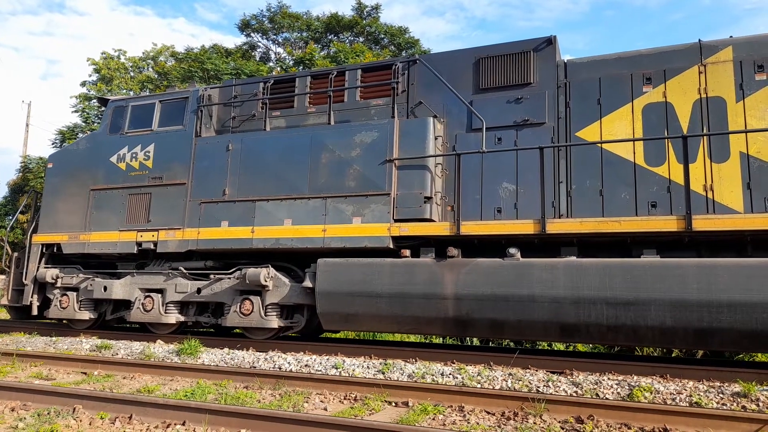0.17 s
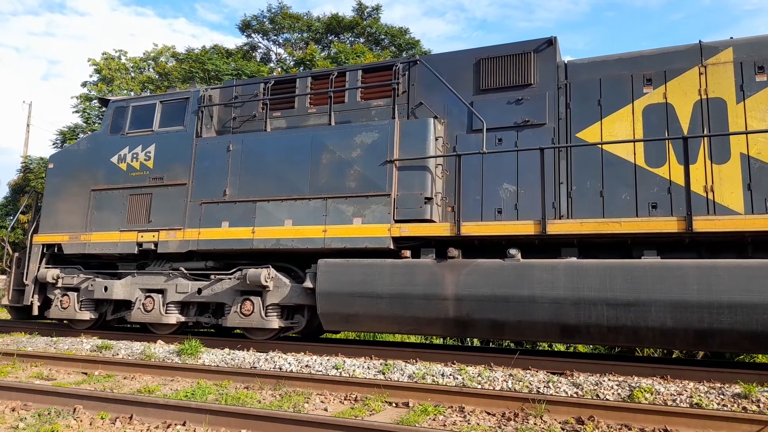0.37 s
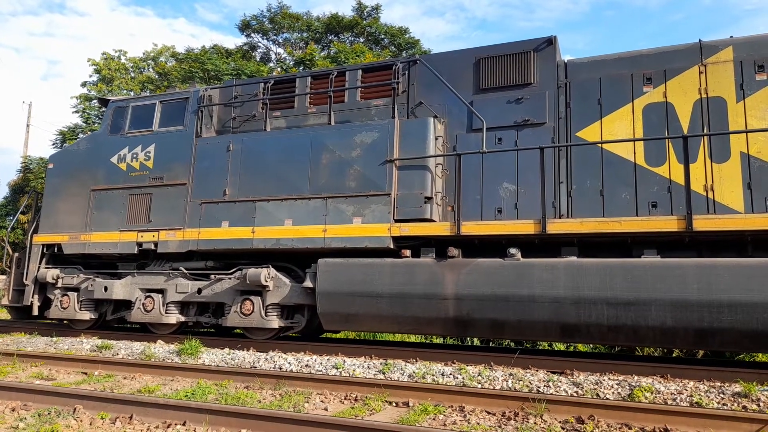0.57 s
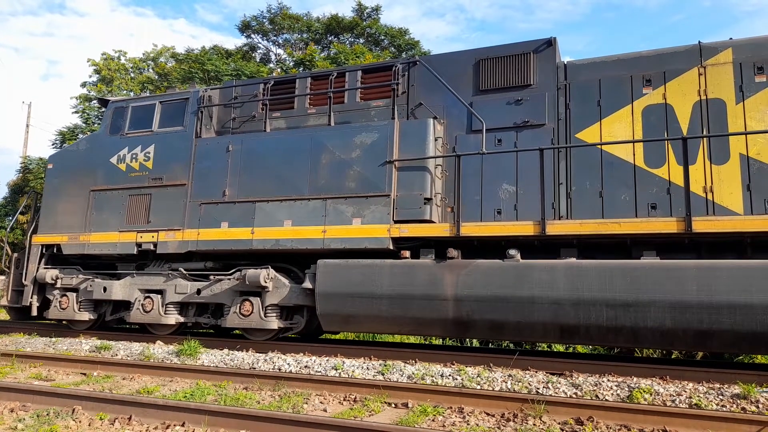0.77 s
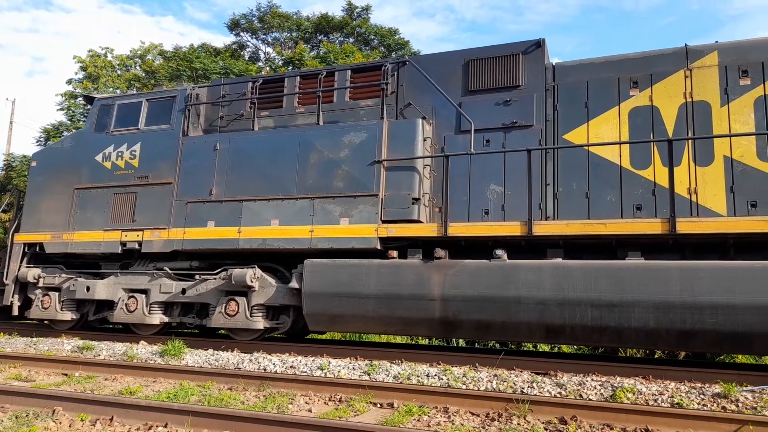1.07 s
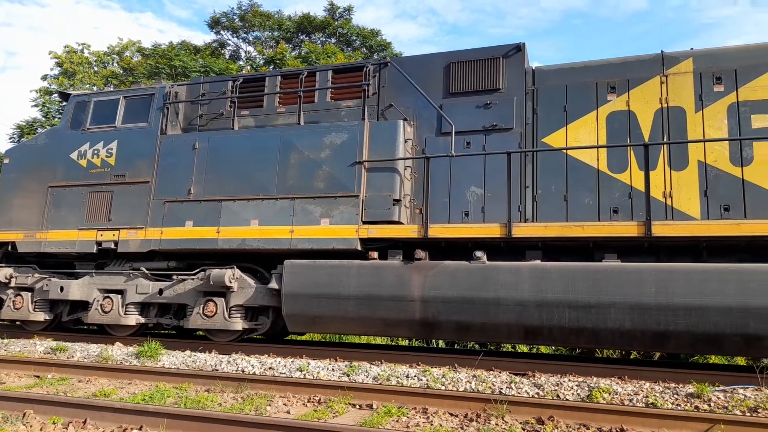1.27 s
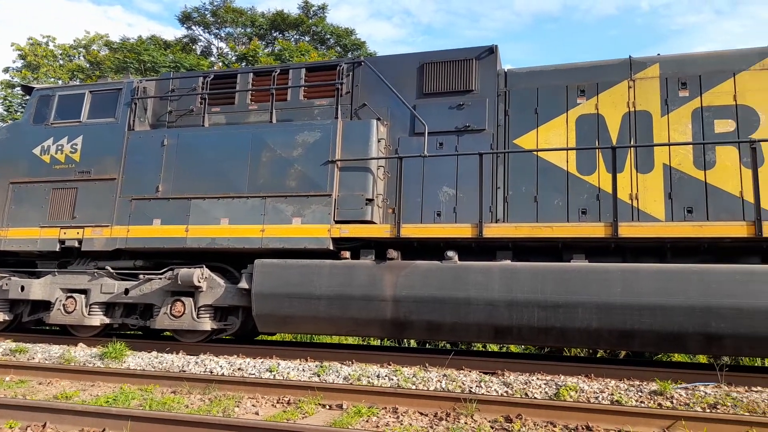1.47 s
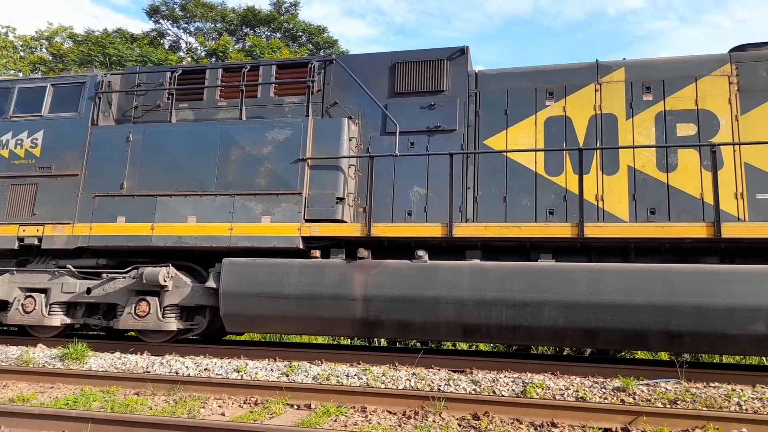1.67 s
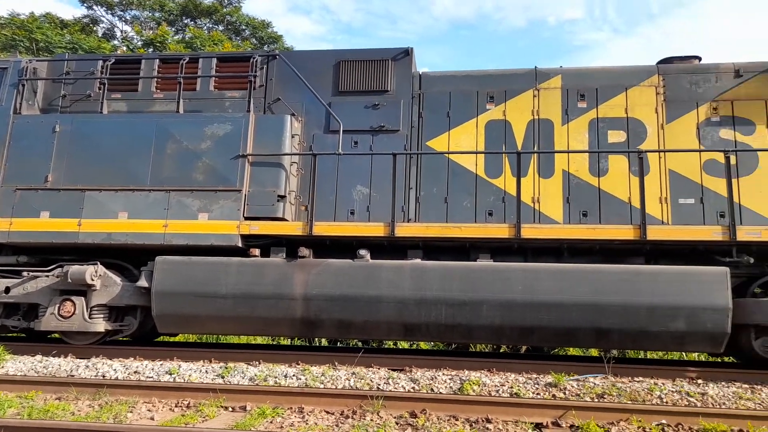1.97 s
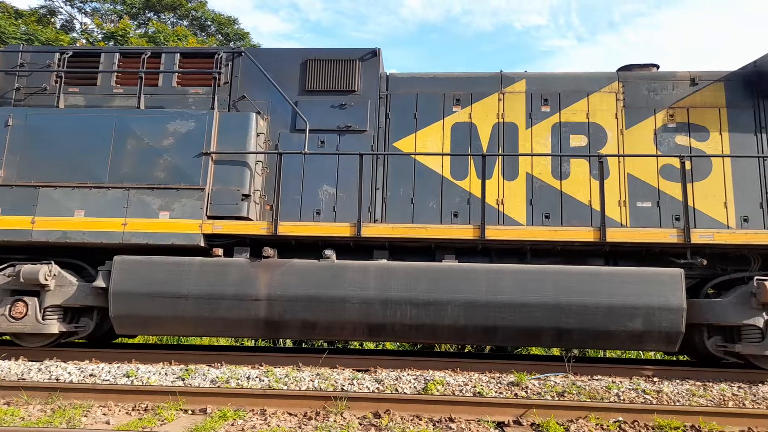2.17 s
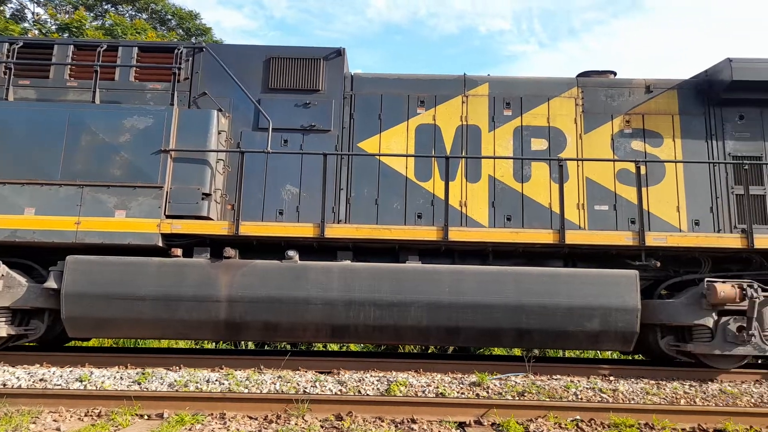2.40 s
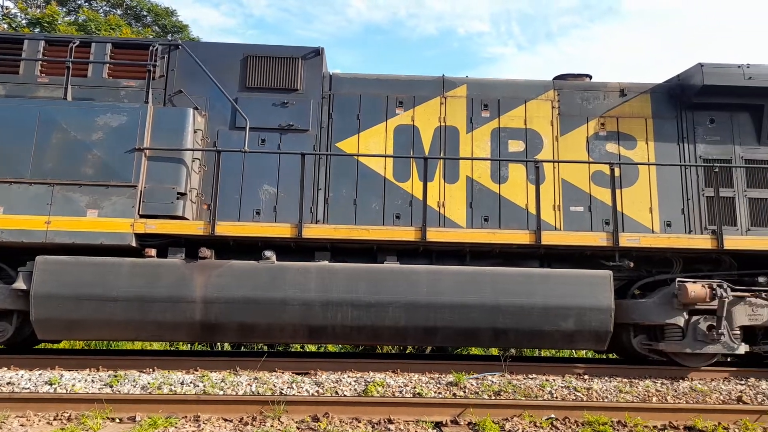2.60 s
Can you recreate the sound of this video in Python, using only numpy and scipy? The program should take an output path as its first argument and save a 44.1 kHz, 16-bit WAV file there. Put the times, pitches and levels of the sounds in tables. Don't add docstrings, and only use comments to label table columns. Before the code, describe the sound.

A diesel locomotive idles close by, throbbing low and humming as its engine speed climbs slightly.

```python
import sys
import numpy as np
from scipy import signal
from scipy.fft import rfft, irfft
from scipy.io import wavfile
from scipy.ndimage import uniform_filter1d

SR = 44100
rng = np.random.default_rng(int(sys.argv[2]) if len(sys.argv) > 2 else 0)


def how_loud(loudness_db):
    steps = np.asarray(loudness_db, float) / 20
    return 10 ** steps


def store_pcm(level_fs):
    pcm = np.round(np.clip(level_fs, -1, 1) * 32767).astype(np.int16)
    wavfile.write(sys.argv[1], SR, np.atleast_2d(pcm).T)


N = 120834


def evened(x):
    return x / np.sqrt(np.mean(x ** 2) + 1e-20)


def read(points, hz):
    f, value = np.transpose(points)
    return np.interp(np.log(hz + 1), np.log(f + 1), value)


def curve(points):
    s, value = np.transpose(points)
    return np.interp(np.arange(N) / SR, s, value)


def drift(hz):
    t = np.arange(0, N / SR, 1 / 400)
    slow = np.zeros(len(t))
    for f in np.geomspace(hz / 12, hz, 12):
        slow += np.sin(2 * np.pi * (f * t + rng.random())) / np.sqrt(f)
    return np.interp(np.arange(N) / SR, t, evened(slow))


def resonate(x, hz, width):
    turn = np.exp(2j * np.pi * np.cumsum(hz * np.ones(N)) / SR)
    r = np.exp(-np.pi * width / SR)
    return evened((turn * signal.lfilter([1], [1, -2 * r, r * r], x / turn)).real)


def air_noise():
    # frequency [Hz], left-right likeness [0-1]
    likeness = [(60, 0.97), (180, 1), (550, 0.88), (850, .75), (1150, 0.65), (1800, 0.55), (2300, .2),
                (5000, 0.028)]
    a, b = rfft(rng.standard_normal((2, N)))
    same = np.clip(read(likeness, np.fft.rfftfreq(N, 1 / SR)), -1, 1)
    return irfft([a, same * a + np.sqrt(1 - same ** 2) * b], N)


def wash(spectrum, db, patchy_db):
    hz, t, z = signal.stft(air_noise(), SR, nperseg=2048, noverlap=1536)
    patches = rng.standard_normal((len(t), len(hz)))
    patches = uniform_filter1d(uniform_filter1d(patches, 5, 0), 20, 1)
    patches = evened(patches).T
    inside = (hz >= spectrum[0][0]) & (hz <= spectrum[-1][0])
    colour_db = read(spectrum, hz)[:, None] + patchy_db * patches
    z = z * how_loud(colour_db) * inside[:, None]
    noise = signal.istft(z, SR, nperseg=2048, noverlap=1536)[1][:, :N]
    return how_loud(db) * evened(noise)


def throb(cycles):
    return np.cos(2 * np.pi * (cycles - 510 / 720))


def struck(blows, ring_cycles):
    t = np.arange(N) / SR
    out = np.zeros(N)
    for s, hz, db in blows:
        bump = np.exp(-((t - s) * hz / ring_cycles) ** 2)
        out += how_loud(db) * np.sqrt(2) * bump * np.cos(2 * np.pi * hz * (t - s))
    return out


def air_leak():
    # frequency [Hz], density [dB per Hz]
    hiss_spectrum = [(8000, -5.5), (9740, -9), (11900, -6.5), (14000, -11), (16500, -23)]
    # time [s], leak level [dB]
    leak_db = [(0, 1), (.1, 4.5), (.2, 2.5), (1.2, 0.5), (2.3, -2), (2.36, 0.5), (2.74, 3)]
    return wash(hiss_spectrum, -57.5, patchy_db=1.0) * how_loud(curve(leak_db) + 1.1 * drift(17))


def turbulence(load_db):
    # frequency [Hz], density [dB per Hz]
    thrum_spectrum = [(38, -14), (47, -1), (100, -1), (125, -6)]
    rumble_spectrum = [(125, -3), (205, -15.5), (255, -6.5), (340, -9.5), (460, -16.5), (780, -15.5)]
    roar_spectrum = [(780, -4), (860, -9), (1130, -12.5), (1360, -15.5), (1930, -8), (2470, -17),
                     (7400, -24), (8000, -29)]
    thrum = wash(thrum_spectrum, -30, patchy_db=0.5) * how_loud(0.56 * load_db)
    rumble = wash(rumble_spectrum, -28.5, patchy_db=-1.0) * how_loud(0.27 * load_db)
    roar = wash(roar_spectrum, -39.5, patchy_db=1.35) * how_loud(0.085 * load_db + 0.5 * drift(6.74))
    return thrum + rumble + roar


def brake_squeaks():
    # start [s], length [s], from [Hz], to [Hz], width [Hz], level [dB]
    rubs = [(0, .7, 150, 151, 4, -39), (.62, .62, 672, 688, 8, -42), (1.082, .16, 5400, 5900, 202, -54),
            (1.75, .35, 528, 535, 10, -42), (1.96, 0.12, 400, 420, 30, -36),
            (2.075, 0.08, 495, 525, 30, -30), (2.17, .12, 350, 430, 60, -34),
            (2.19, 0.15, 2800, 3100, 350, -41), (2.22, .1, 575, 600, 30, -37),
            (2.33, 0.145, 4740, 4800, 90, -47), (2.34, 0.15, 625, 605, 35, -36),
            (2.35, 0.1, 4350, 4750, 150, -47), (2.63, .11, 3000, 3100, 350, -46)]
    t, out = np.arange(N) / SR, np.zeros((2, N))
    for start_s, length_s, from_hz, to_hz, width_hz, db in rubs:
        u = np.clip((t - start_s) / length_s, 0, 1)
        pitch_hz = from_hz + (to_hz - from_hz) * u
        out += how_loud(db) * np.sin(np.pi * u) ** 0.5 * resonate(air_noise(), pitch_hz, width_hz)
    return out


def blower():
    # pitch [Hz], level [dB]
    blower_tones = [
        (482.4, -39.5),
        (964.3, -58),
    ]
    t = np.arange(N) / SR
    out = np.zeros(N)
    for hz, db in blower_tones:
        out += how_loud(db + 1.35 * drift(6.9)) * np.sin(2 * np.pi * hz * t + 0.18 * drift(6.4))
    return np.sqrt(2) * out


def machine_hum():
    # time [s], pitch [Hz], level of each multiple [dB] (three columns)
    hum_points = [(0, 240, -33, -42.5, -63), (.4, 240.6, -36, -37.5, -54), (.75, 243, -35.5, -40.5, -58),
                  (.9, 244.5, -36.5, -50, -60), (1.071, 248, -41, -39.5, -66),
                  (1.251, 251, -29.5, -56, -68), (1.45, 255, -32, -41.5, -61), (1.649, 262, -34, -41, -60),
                  (2.0, 262, -29.5, -44, -58), (2.3, 259.5, -32.5, -45.5, -51),
                  (2.48, 258.5, -34, -50, -51), (2.74, 262.5, -35, -38, -52)]
    multiples = [1, 3, 6]
    s, *columns = np.transpose(hum_points)
    pitch_hz, *level_db = [np.interp(np.arange(N) / SR, s, column) for column in columns]
    turns = np.cumsum(pitch_hz) / SR
    hum = np.zeros(N)
    for k, db in zip(multiples, level_db):
        hum += how_loud(db + 0.46 * drift(6.67)) * np.sin(2 * np.pi * k * turns + 0.25 * drift(8.3))
    fuzz = how_loud(-41) * resonate(air_noise(), pitch_hz, 30)
    return np.sqrt(2) * hum + fuzz


def panels(cycles):
    # pitch [Hz], width [Hz], level [dB], throb depth [dB]
    panel_modes = [(1085, 300, -41, 0.5), (1766, 294, -45, 1), (3004, 540, -49.5, 1.5),
                   (4310, 240, -57.5, 2), (7110, 530, -56, 1.6), (11650, 900, -67.5, 2.2)]
    jolt = 1 + 0.27 * np.cos(2 * np.pi * 16 * cycles)
    out = np.zeros((2, N))
    for hz, width_hz, db, throb_db in panel_modes:
        swell = throb(cycles) + 0.67 * drift(14)
        clatter = jolt * air_noise()
        ringing = resonate(clatter, hz * (1 + 0.013 * drift(4.06)), width_hz)
        out += how_loud(db + throb_db * swell) * ringing
    return out


def turbo(cycles):
    # time [s], pitch [Hz]
    whistle_pitch = [(0, 1842), (.6, 1942), (1.5, 1977), (2.1, 1935), (2.74, 1990)]
    # time [s], level [dB]
    whistle_level = [(0, -6), (.17, 4), (.3, -4.5), (.45, 1), (.65, -5), (.85, -1), (1.0, -4), (1.25, -2.5),
                     (1.42, 3.5), (1.55, -2.5), (1.68, 4), (1.8, -3), (1.9, -3), (2.05, -4), (2.22, 1.5),
                     (2.45, -1.5), (2.62, -4), (2.74, 1.5)]
    swell = throb(cycles) + 0.5 * drift(5.61)
    pitch_hz = curve(whistle_pitch) * (1 + 0.0048 * drift(4.86))
    whistle = resonate(air_noise(), pitch_hz, 150)
    return how_loud(-35.5 + curve(whistle_level) + 0.5 * swell) * whistle


def knock(cycles, rate):
    # pitch [Hz], width [Hz], level [dB]
    block_modes = [
        (283, 53, -9.5),
        (330, 54, -4),
    ]
    knock_deg, burst_s = 224, 0.016
    since_s = ((cycles - knock_deg / 720 + 0.5) % 1 - 0.5) / rate
    burst = np.exp(-(since_s / burst_s) ** 2) * how_loud(3.8 * drift(1.9))
    block = sum(how_loud(db) * resonate(air_noise(), hz, width_hz) for hz, width_hz, db in block_modes)
    return how_loud(-34.5) * burst * block


def block_raps():
    # time [s], pitch [Hz], level [dB]
    raps = [(.12, 270, -29), (.39, 268, -25), (.70, 264, -25.5), (.965, 320, -25), (1.25, 285, -29),
            (1.535, 271, -22), (1.81, 290, -29), (2.075, 282, -27), (2.345, 267, -22), (2.615, 295, -28)]
    return struck(raps, ring_cycles=4.77)


def hard_firings():
    # time [s], pitch [Hz], level [dB]
    thuds = [
        (0.479, 98, -20),
        (.772, 102, -21),
        (1.06, 100, -25),
        (1.41, 96, -21),
    ]
    return struck(thuds, ring_cycles=2.9)


def exhaust(cycles):
    # firing crank angle [deg of 720], strength at four stages of the climb [dB]
    firing = [(-39.4, -50.0, -49.0, -62.0, -62.0), (27.1, -62.0, -62.0, -50.0, -49.0),
              (53.3, -56.0, -41.0, -45.0, -46.0), (100.6, -62.0, -49.0, -45.0, -45.0),
              (157.2, -55.0, -62.0, -61.0, -62.0), (218.9, -58.0, -62.0, -51.0, -50.0),
              (235.9, -50.0, -47.0, -56.0, -62.0), (272.8, -58.0, -60.0, -53.0, -49.0),
              (324.6, -61.0, -45.0, -42.0, -43.0), (373.9, -55.0, -47.0, -46.0, -48.0),
              (420.9, -46.0, -44.0, -44.0, -46.0), (471.8, -62.0, -59.0, -48.0, -53.0),
              (518.4, -55.0, -46.0, -50.0, -49.0), (553.8, -48.0, -49.0, -48.0, -48.0),
              (600.9, -53.0, -47.0, -41.0, -42.0), (649.3, -49.0, -52.0, -62.0, -62.0)]
    stages_s = [.2, .9, 1.6, 2.4]
    cut_hz, stack_hz, stack_damp, cycle_hz = 30, 68.6, 0.2, 3.6
    angle, *stage_db = np.transpose(firing)
    strength = how_loud(np.array(stage_db))
    stage = np.array([curve(list(zip(stages_s, on))) for on in np.eye(len(stages_s))])
    out = np.zeros(N)
    for k in range(10, 42):
        s = 1j * k * cycle_hz
        low = cut_hz / s
        bass_cut = 1 / (1 + 1.2 * low + low ** 2) ** 2
        stack = bass_cut / (1 + stack_damp * s / stack_hz + (s / stack_hz) ** 2)
        puffs = strength @ np.exp(-2j * np.pi * k * angle / 720) @ stage
        out += (stack * puffs * np.exp(2j * np.pi * k * cycles)).real
    return how_loud(0.8 + 0.2 * drift(3.76)) * out


def scene():
    # time [s], four-stroke cycles per second [Hz]
    engine_speed = [(0.0, 3.3778), (0.5, 3.4115), (0.9, 3.4761), (1.3, 3.5693), (1.7, 3.7037),
                    (2.1, 3.6828), (2.74, 3.6115)]
    # time [s], engine load [dB]
    engine_load = [(0, -5.5), (.5, 0), (1.3, 0.5), (2.0, 0.6), (2.74, 1.5)]
    rate, load_db = curve(engine_speed), curve(engine_load)
    cycles = np.cumsum(rate) / SR
    air = turbulence(load_db) + air_leak()
    machinery = (panels(cycles) + turbo(cycles) + knock(cycles, rate)) * how_loud(0.93 * load_db)
    tones = blower() + machine_hum()
    blows = block_raps() + hard_firings()
    return air + brake_squeaks() + tones + machinery + blows + exhaust(cycles)


def band_limit(x):
    return signal.sosfilt(signal.butter(12, 15680, fs=SR, output="sos"), x)


def record(dry):
    # frequency [Hz], left minus right [dB]
    lean = [(60, -3), (130, 0), (290, -2.5), (800, 1.5), (1820, 0), (2050, 1.5), (6820, -9), (15000, -9)]
    lag_s, mic_cut_hz = 0.00015, 41
    long = np.pad(dry, ((0, 0), (4096, 4096)), "reflect")
    hz = np.fft.rfftfreq(long.shape[1], 1 / SR)
    side = np.array([[0.5], [-0.5]])
    colour = how_loud(side * read(lean, hz))
    delay = np.exp(-2j * np.pi * hz * lag_s * side)
    bass_cut = 1 / (1 + (mic_cut_hz / (hz + 1)) ** 8)
    heard = irfft(rfft(long) * colour * delay * bass_cut, long.shape[1])[:, 4096:-4096]
    return band_limit(heard)


dry = scene()
out = record(dry)
store_pcm(out)
```